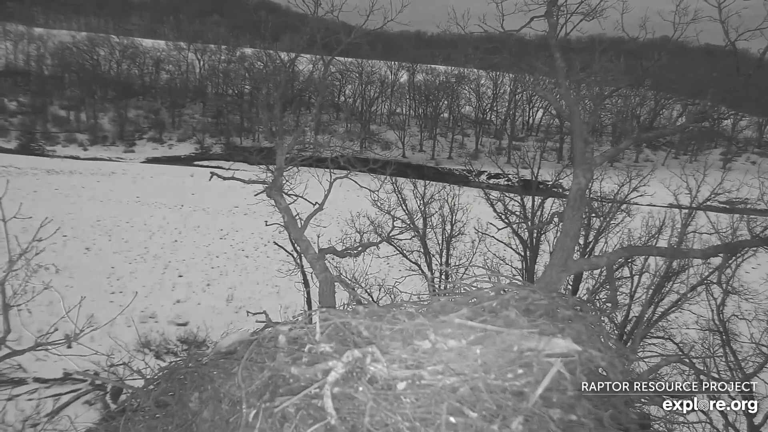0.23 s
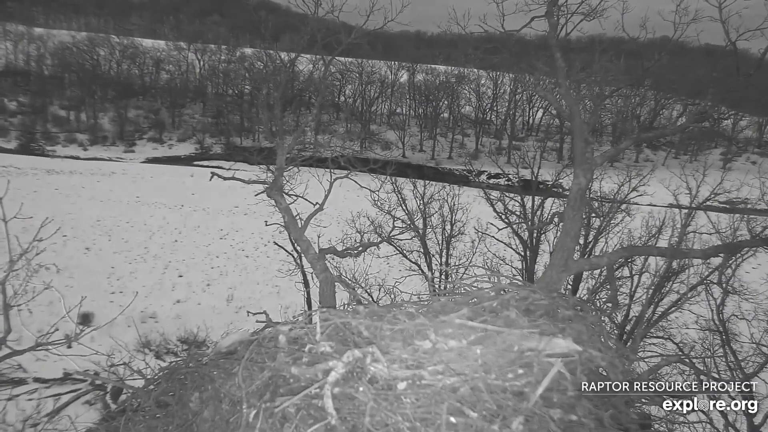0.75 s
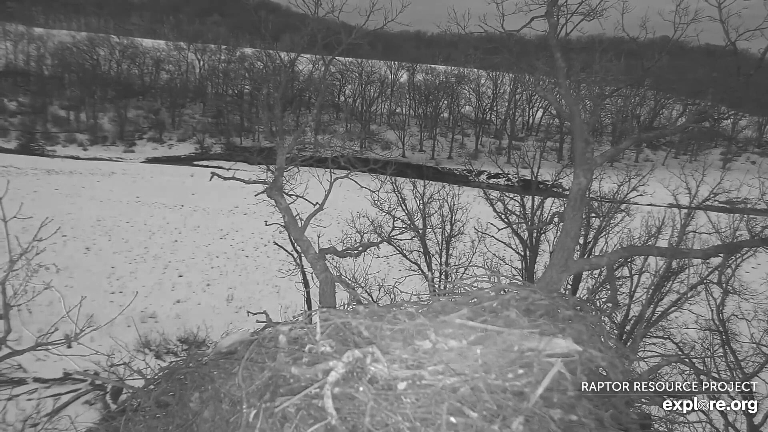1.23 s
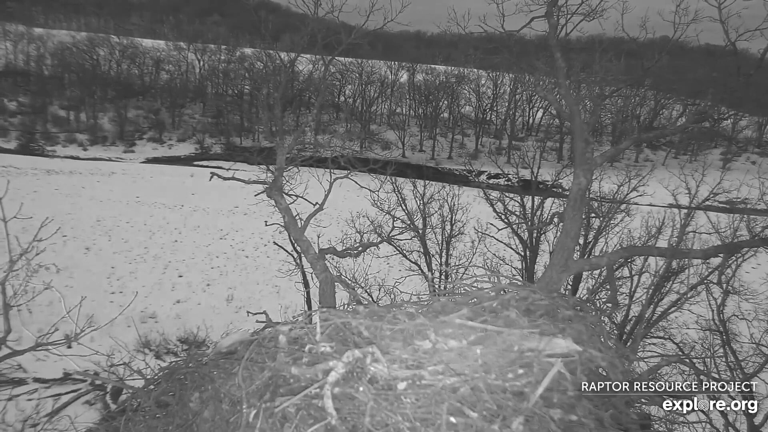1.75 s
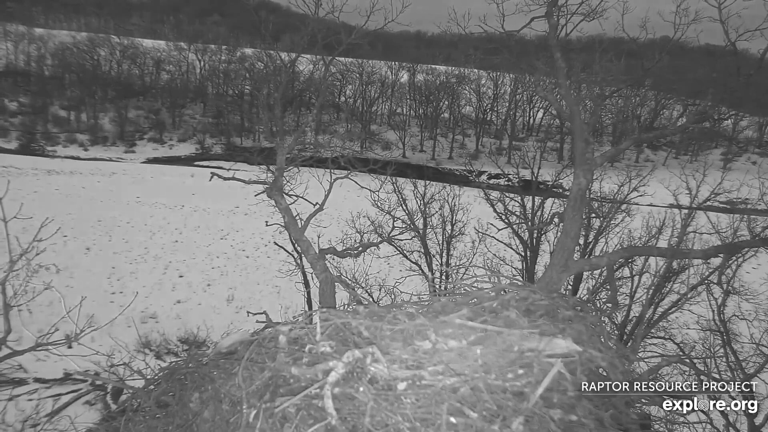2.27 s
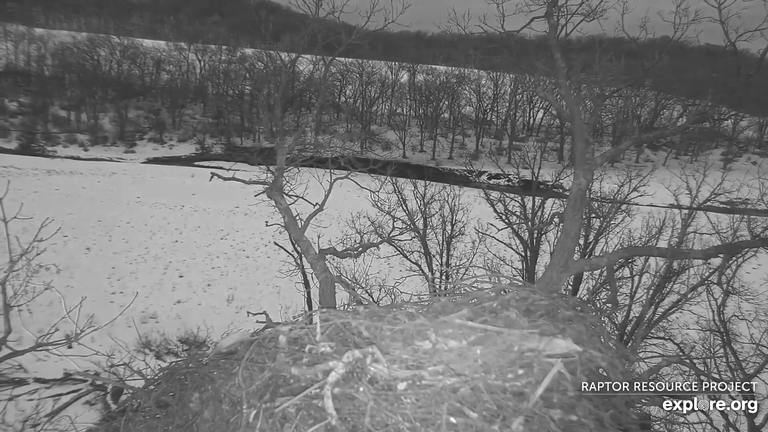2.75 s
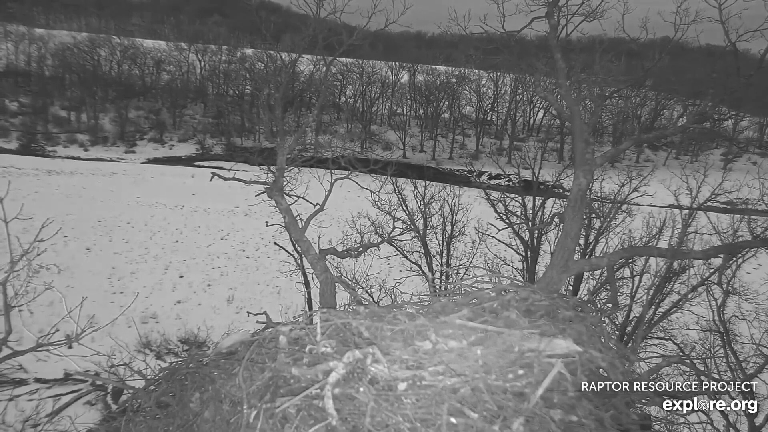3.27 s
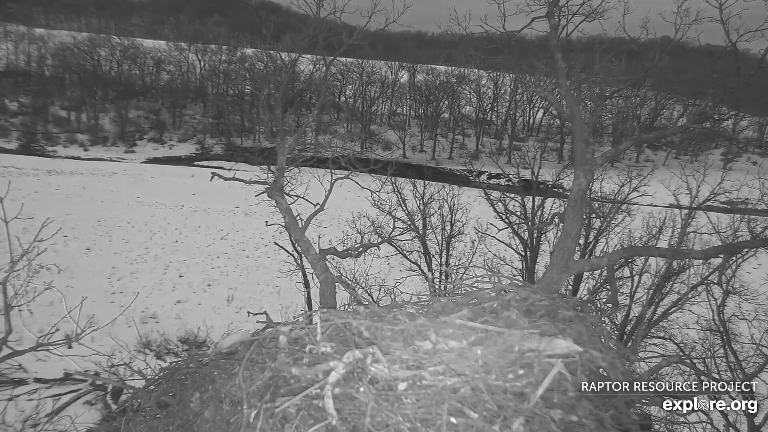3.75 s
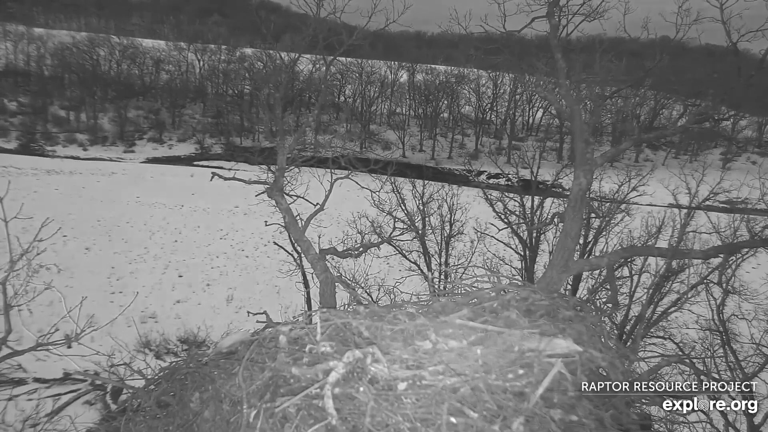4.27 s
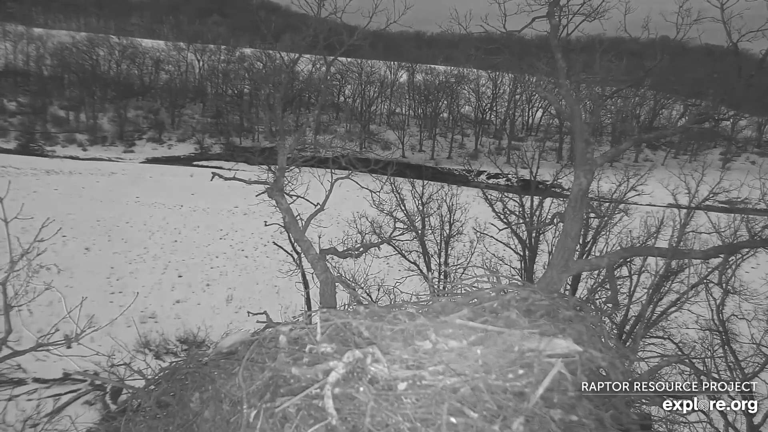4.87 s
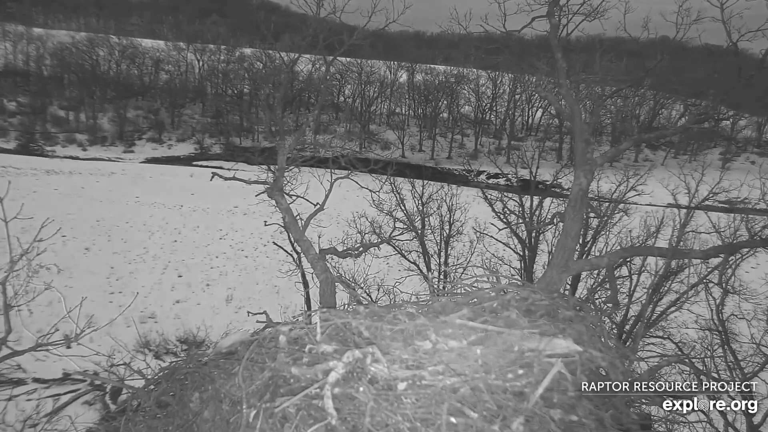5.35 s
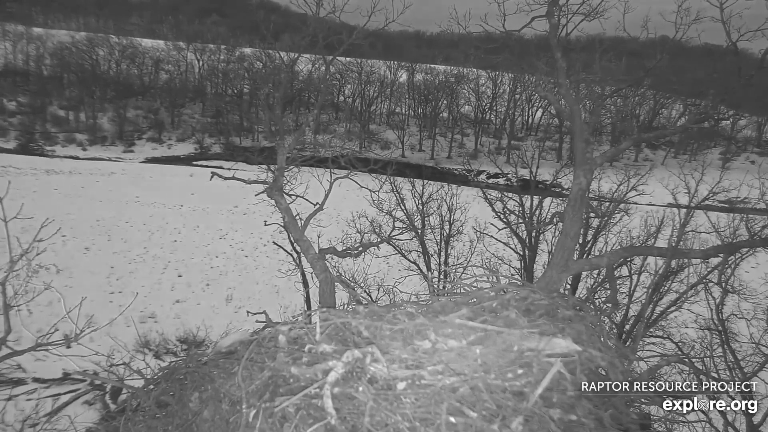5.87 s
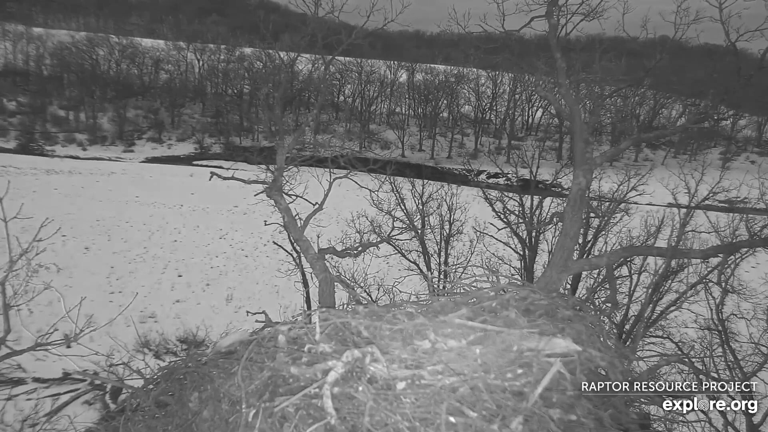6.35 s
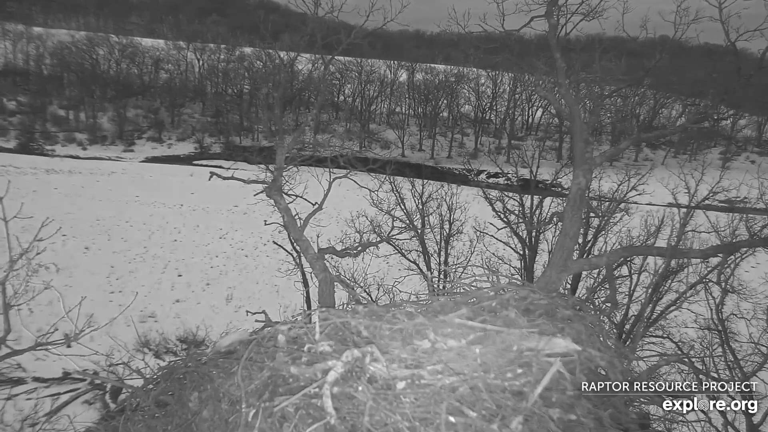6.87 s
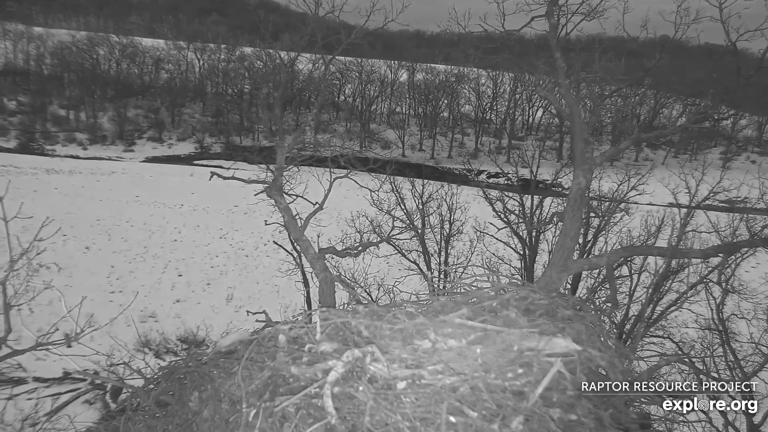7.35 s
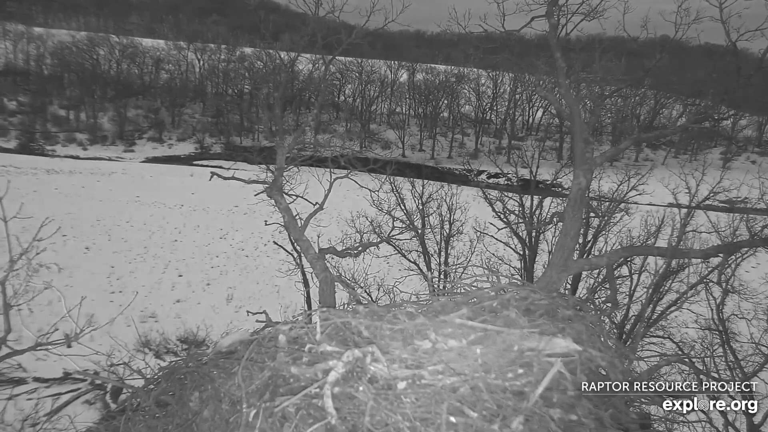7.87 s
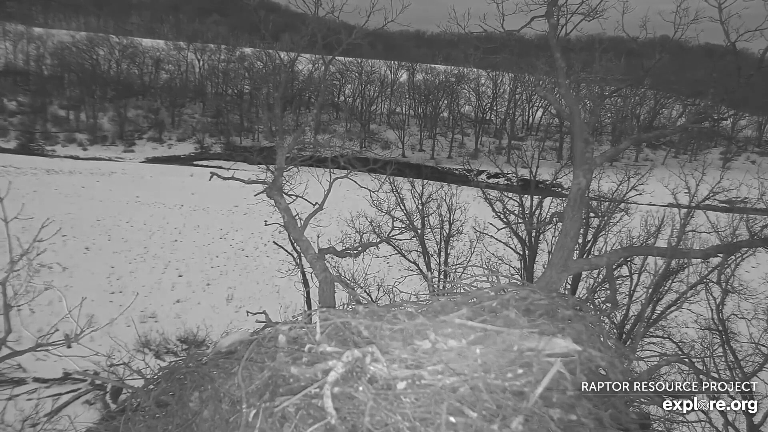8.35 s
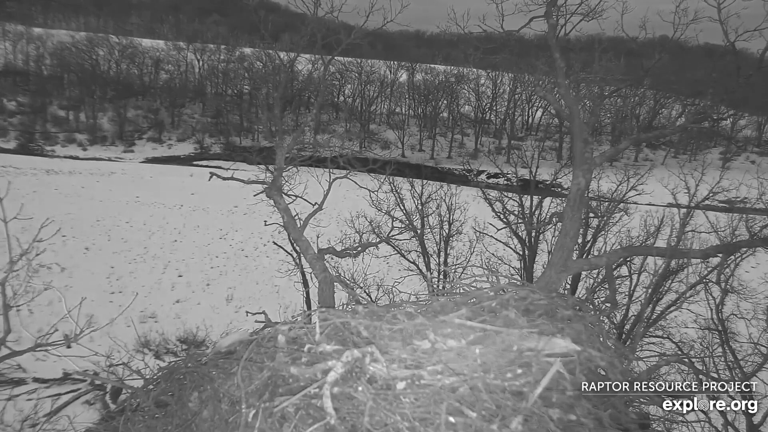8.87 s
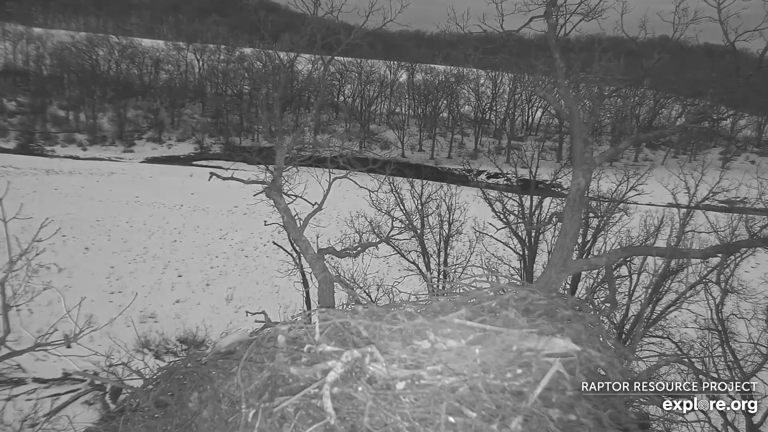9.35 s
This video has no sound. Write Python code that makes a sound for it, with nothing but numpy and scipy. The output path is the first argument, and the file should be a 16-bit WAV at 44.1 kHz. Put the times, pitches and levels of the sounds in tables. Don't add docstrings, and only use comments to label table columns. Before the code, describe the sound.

Throughout, distant traffic makes a steady, smooth low rumble, with a deep engine hum near 95 hertz, soft low wind and faint high hiss. At first there is only this bed, with two tiny ticking gasps around 1 second. From 2 to 3.7 seconds a large raptor somewhat away gives irregular, very short piercing squeals near 3.5 kilohertz, mixed with hoarse rasping breaths, thin whistles and a yelp at 3.1. After a pause, a faint, turned-away run of five piping notes steps downward at 4.5-4.9. A clearer run follows at 5.5-6.2, then a stronger one at 7.1-8.1, each rising briefly on its opener and ending on a low pip. A soft gust passes around 8.4. The last, brightest run starts at 8.8 and continues almost to the end at 9.6. Notes come about eight per second, with short woodland echoes.

```python
import sys
import numpy as np
from scipy import signal
from scipy.io import wavfile
from scipy.ndimage import uniform_filter1d

SR = 44100
rng = np.random.default_rng(int(sys.argv[2]) if len(sys.argv) > 2 else 0)


def file_out(sig):
    cols = np.atleast_2d(sig).T
    lim = np.clip(cols, -1, 1)
    pcm = np.round(lim * 32767).astype(np.int16)
    wavfile.write(sys.argv[1], SR, pcm)


def rack_gain(trim_db):
    fader = np.asarray(trim_db, float)
    return 10 ** (fader / 20)


N = 424241

# frequency in Hz, level in dB per Hz.
TRAFFIC_COLOUR = [(60, -36), (80, -11), (95, -7.5), (120, -3.5), (145, 0.5), (210, -8), (290, -12.5),
                  (420, -24), (540, -34), (700, -34.5), (1100, -45.5), (1500, -54), (2000, -61),
                  (2600, -94)]
# time in seconds, level in dB.
TRAFFIC_SWELL = [(0, -21), (1.5, -21.5), (2.5, -20), (4.3, -22.5), (5.5, -22.5), (7, -21.5), (8.3, -20.5),
                 (9.62, -21)]
# frequency in Hz, level in dB per Hz.
WIND_COLOUR = [(13, -58), (22, -38), (40, -16), (55, -1.5), (66, 13), (74, 19.5), (84, 14.5), (95, -36.5)]
# time in seconds, firing rate in Hz, level in dB.
ENGINE = [(0, 95.75, -26), (1, 95.3, -26), (2.8, 95.85, -25), (4.1, 96.56, -26), (5.5, 96.06, -24.5),
          (6.2, 96.06, -25.5), (7.5, 94.3, -26), (8.4, 97.5, -24.5), (8.7, 97.3, -23.5), (9.62, 97.6, -24)]
# frequency in Hz, level in dB per Hz.
HISS_COLOUR = [(1200, -34), (1700, -25), (2100, -45), (2500, -20), (3200, -10), (4000, -7.5), (5000, -5.5),
               (6300, -3.5), (8500, -3), (11000, 0.5), (13700, 1), (15500, -2)]
# start in seconds, level in dB, length in seconds,
# beak opening as a factor on the throat resonances.
GASPS = [
    (1.006, -47.5, .006, 1.14),
    (1.127, -51, .006, 1.2),
    (4.449, -54, .015, 1.05),
    (5.589, -48.5, 0.013, 1.08),
    (7.188, -52, .035, 0.97),
    (7.228, -44, 0.029, 1.13),
    (8.082, -62, 0.013, 0.73),
    (8.857, -41, 0.046, 1.116),
    (9.234, -45, .02, 1.13),
    (9.374, -45, 0.023, 1.06),
]
# frequency in Hz, width in Hz, level in dB.
THROAT = [(3920, 420, -2), (4720, 540, 2.5), (5430, 730, -0.5)]
# start in seconds, level in dB, pitch in Hz,
# 2nd harmonic in dB, length in seconds.
SQUEALS = [(1.957, -16, 3487, -31, 0.011), (2.3343, -9.5, 3470, -26, 0.015),
           (2.4613, -20, 3470, -17, 0.011), (2.7437, -9.5, 3460, -14, 0.016),
           (2.8614, -27, 3540, -12, 0.013), (3.5902, -15.5, 3446, -12, 0.028),
           (4.4707, -28, 3560, -27, .012), (4.5775, -26, 3580, -26, 0.014), (4.6977, -44, 3500, -20, 0.015),
           (5.6042, -21.5, 3606, -12, 0.011), (5.7154, -26, 3590, -16, 0.011),
           (7.2429, -18, 3660, -13, 0.012), (7.3721, -31.5, 3700, -15, .013),
           (8.9047, -18, 3790, -22, 0.011), (8.9994, -34, 3670, -16, 0.011)]
# start in seconds, hiss in dB, croak in dB,
# croak pitch in Hz, length in seconds.
RASPS = [(1.974, -45, -66, 1200, 0.055), (2.098, -41, -46, 1100, 0.057), (2.354, -44, -55, 1240, 0.037),
         (2.468, -39, -44.5, 930, 0.041), (2.759, -43, -60, 1250, 0.064), (2.853, -43, -48, 1080, 0.065),
         (3.177, -44, -49, 970, 0.047), (3.229, -44, -65, 990, 0.062), (3.293, -45, -38, 920, 0.0241),
         (3.603, -49, -58, 1100, 0.051), (3.654, -44, -62, 1110, 0.055), (3.705, -57, -40, 890, 0.02)]
# start in seconds, level in dB, start pitch in Hz,
# end pitch as a factor, length in seconds.
WHISTLES = [(2.028, -33.5, 5230, 1.22, 0.078), (2.089, -30, 5660, 0.86, 0.0061),
            (2.093, -29, 4300, 0.95, .013), (2.325, -39, 2840, 1.02, 0.018), (2.337, -40, 6300, 1.06, .02),
            (2.398, -34.5, 4800, 1.1, 0.014), (2.41, -31.5, 5470, 1.13, 0.06),
            (2.456, -27, 4220, 0.985, 0.0094), (2.762, -37, 3050, 0.96, 0.018),
            (2.828, -32.5, 6240, 1.025, 0.052), (2.853, -29.5, 4320, 0.93, 0.019),
            (3.181, -37, 3630, 0.94, 0.02), (3.587, -36.5, 2820, 1.03, 0.034),
            (3.59, -37, 4130, 0.98, 0.014), (3.6, -32.5, 6350, 0.96, 0.022),
            (7.484, -46, 4500, 1.001, 0.013), (8.22, -50, 3790, 0.99, 0.02), (8.851, -37, 5100, 0.97, .012),
            (8.87, -34, 5040, 1.1, 0.012), (9.51, -41, 4900, 1, .02)]
# start in seconds, level in dB, pitch in Hz,
# 2nd harmonic in dB, 3rd harmonic in dB.
YELPS = [
    (3.146, -17.5, 2827, -0.65, -16),
]
PIPED_NOTES = [(4.4753, -35, 3037, 1, -16), (4.582, -36.5, 3050, -2, -18), (4.684, -36, 2916, 4, -22),
               (4.796, -40.5, 2860, 3.5, -17), (4.91, -53, 2730, -6, -12), (5.715, -30, 2985, 4.5, -18),
               (5.8294, -29.5, 2936, 4.5, -16), (5.9506, -34, 2830, 4.5, -20),
               (6.0865, -34.5, 2874, 0.5, -23), (7.3626, -26.5, 3024, 4, -2.5), (7.493, -25, 2952, 1.5, -6),
               (7.6298, -28, 2938, 7.5, -10), (7.773, -27.5, 2871, 4, -18), (7.931, -31, 2850, 0.5, -26),
               (8.8872, -24.5, 3086, 5, -2), (9.002, -24.5, 3050, 5.5, -0.5), (9.1186, -25, 2985, 10, -7),
               (9.251, -24, 2857, 6, -25), (9.3865, -24, 2814, 5, -26), (9.5198, -29, 2820, 0.5, -25)]
RUN_OPENERS = [
    (5.4869, -29.5, 2930, 3.5, -19),
    (7.1192, -24.5, 2983, 5, -4.5),
    (8.775, -25.5, 2910, 9, 1),
]
RUN_CLOSERS = [
    (6.2213, -32, 2095, -1, -15),
    (8.093, -37, 2140, 7, -5),
    (9.5158, -45, 2150, -1, -26),
]
# start in seconds, main echo delay in seconds, echo in dB,
# scattered tail in dB, head shadow from 0 to 1.
FACING = [
    (0, .021, -13, -12, .05),
    (2.9, 0.017, -6, -12.5, 0.28),
    (3.5, 0.021, -8.5, -9.5, 0),
    (4.2, 0.016, 6.5, 0.5, 0.97),
    (5.3, .023, 3.5, -3, 0.44),
    (6.19, .023, -8, -5.5, .3),
    (6.8, 0.025, 1.5, -1.5, 0.03),
    (8.06, .023, -1, -3.5, 0.1),
    (8.6, 0.019, -1.5, -6.5, 0.19),
]
# factor on the main echo delay, level in dB.
TRUNKS = [(.45, -5), (1.001, -1.2), (1.298, -5), (1.749, -9), (2.2, -15), (2.899, -17)]
# frequency in Hz, time to fall 60 dB in seconds.
WOODS_DECAY = [(800, 0.34), (2000, 0.62), (2800, 0.67), (3500, 0.52), (6000, 0.48), (9000, 0.26)]


def evened(x):
    return x / np.sqrt(np.mean(x ** 2) + 1e-20)


def read(points, hz):
    f, value = np.transpose(points)
    return np.interp(np.log(hz + 1), np.log(f + 1), value)


def add(mix, s, sound):
    part = mix[round(s * SR):][:len(sound)]
    part += sound[:len(part)]


def resonate(x, hz, width):
    turn = np.exp(2j * np.pi * np.cumsum(hz * np.ones(len(x))) / SR)
    r = np.exp(-np.pi * width / SR)
    smooth = signal.lfilter([1 - r], [1, -r], x / turn + 1e-18)
    return 2 * (turn * smooth).real


def resonate_twice(x, hz, width):
    return resonate(resonate(x, hz, width), hz, width)


def noise(colour, patchy_db, size):
    hz = np.fft.rfftfreq(size, 1 / SR)
    real, imag, patches = rng.standard_normal((3, len(hz), 4 * N // size + 5))
    patches = uniform_filter1d(patches, size=9, axis=0)
    patches = evened(uniform_filter1d(patches, size=7, axis=1))
    spectra = (real + 1j * imag) * rack_gain(read(colour, hz)[:, None] + patchy_db * patches)
    return evened(signal.istft(spectra, nperseg=size, noverlap=3 * size // 4)[1][:N])


def rumble():
    t = np.arange(N) / SR
    traffic = rack_gain(np.interp(t, *np.transpose(TRAFFIC_SWELL))) * noise(TRAFFIC_COLOUR, patchy_db=1.0, size=4096)
    wind = rack_gain(-35) * noise(WIND_COLOUR, patchy_db=2.5, size=8192)
    gust_s, gust_width_s = 8.37, 0.35
    buffet = evened(resonate_twice(rng.standard_normal(N), 48.3, 30))
    gust = rack_gain(-40) * np.exp(-((t - gust_s) / gust_width_s) ** 2) * buffet
    return traffic + wind + gust


def drone():
    s, *columns = np.transpose(ENGINE)
    hz, db = (np.interp(np.arange(N) / SR, s, column) for column in columns)
    firing = np.sqrt(2) * np.sin(2 * np.pi * np.cumsum(hz) / SR)
    air = rng.standard_normal((2, N))
    upper = evened(resonate(resonate(air[0], 1.492 * hz, 9.6), 1.492 * hz, 9.8))
    other = evened(resonate_twice(air[1], 104.67, 5.7))
    return rack_gain(db) * (firing + rack_gain(-8) * upper) + rack_gain(-27.5) * other


def preamp_hiss():
    return rack_gain(-44) * noise(HISS_COLOUR, patchy_db=2.0, size=512)


def breath(length, per_s, flutter):
    n = max(round(length * SR), 40)
    speed, strength = np.repeat(rng.standard_normal((2, 20)), n // 20 + 1, axis=1)[:, :n]
    turns = np.cumsum(per_s * (1 + 0.24 * speed)) / SR
    opening = 0.33 + np.exp(-(turns % 1) / flutter)
    puffs = opening * rng.standard_normal(n) * rack_gain(2.7 * strength)
    return np.pad(puffs * np.hanning(n), (0, 300))


def throat(air, opening):
    wander = np.interp(np.linspace(0, 5, len(air)), np.arange(6), rng.standard_normal(6))
    bend = opening * (1 + 0.03 * wander)
    return sum(rack_gain(db) * resonate_twice(air, hz * bend, width) for hz, width, db in THROAT)


def gasps(out):
    leads = []
    for s, db, hz, *_ in PIPED_NOTES:
        above_top = hz - 3050
        leads.append((s - 0.016, db - 14.5 + 0.07 * above_top, 0.019, 1.043 + 0.00075 * above_top))
    for s, db, length, opening in GASPS + leads:
        add(out, s, rack_gain(db) * evened(throat(breath(length, 300, 0.58), opening)))


def tone(hz, glide, length, parts_db, edge=0.49, scoop=0.021, shake=0.0061, flutter_db=3.0):
    u = np.linspace(0, 1, max(round(length * SR), 40))
    steps = u * length / 0.00285
    tremble, waver = (np.interp(steps, np.arange(40), row) for row in rng.standard_normal((2, 40)))
    slide = (glide - 1) * np.sin(np.pi / 2 * u)
    bend = 1 + slide - scoop * np.exp(-u * length / 0.0033) + shake * tremble
    turns = np.cumsum(hz * bend) / SR
    wave = sum(rack_gain(db) * np.sin(2 * np.pi * (k + 1) * turns) for k, db in enumerate(parts_db))
    return wave * rack_gain(flutter_db * waver) * signal.windows.tukey(len(u), edge)


def squeals(out):
    for s, db, hz, second_db, length in SQUEALS:
        parts_db = db - 4.5 + np.array([0, second_db, -34])
        note = tone(hz, 1.005, 1.11 * length, parts_db, edge=0.67, scoop=0.011, shake=0.0044, flutter_db=2.0)
        add(out, s - 0.004, note)


def rasps(out):
    for s, hiss_db, croak_db, hz, length in RASPS:
        air = breath(1.3 * length, 170, 0.24)
        hiss = throat(air, rng.uniform(0.855, 1.14)) + 0.32 * resonate(air, 1100, 2800)
        croak = resonate(resonate(air, hz, 240), hz, 340)
        thump = resonate_twice(air, 306, 240)
        rasp = rack_gain(hiss_db) * evened(hiss) + rack_gain(croak_db) * evened(croak) + rack_gain(-35.5) * evened(thump)
        add(out, s - 0.008, rasp)


def sum_whistles():
    sums = []
    for s, db, hz, *_ in PIPED_NOTES:
        for up_s, up_db, up_hz, *_ in SQUEALS:
            if abs(up_s - s) < 0.025:
                sums.append((s, min(db - 4.5, up_db + 6), 1.035 * (hz + up_hz), 0.96, 0.0061))
    return sums


def whistles(out):
    full_strain, calm = 0.14, 0.22
    halo_filter = signal.butter(N=3, Wn=940 / SR)
    for s, db, hz, glide, length in WHISTLES + sum_whistles():
        strain = np.clip(abs(glide - 1) / full_strain, calm, 1)
        clear = tone(hz, glide, length, [db], shake=0.022 * strain, flutter_db=4.0)
        air = evened(signal.lfilter(*halo_filter, rng.standard_normal(5200))[200:])
        add(out, s, clear * (0.86 + strain * rack_gain(-2.5) * air[:len(clear)]))


def lower_voice(out):
    # rows, start pitch factor, glide factor, length in seconds
    kinds = [(YELPS, 0.94, 1.1, 0.0357), (PIPED_NOTES, 1.01, 0.98, 0.023),
             (RUN_OPENERS, 0.97, 1.055, 0.0383), (RUN_CLOSERS, 1.01, 0.99, 0.016)]
    for rows, start, glide, length in kinds:
        for s, db, hz, second_db, third_db in rows:
            parts_db = db - 4.0 + np.array([0, second_db, third_db, third_db - 16])
            add(out, s - 0.003, tone(hz * start, glide, length, parts_db))


def raptor():
    out = np.zeros(N)
    for sing in (gasps, squeals, rasps, whistles, lower_voice):
        sing(out)
    return out


def scatter():
    taps = np.zeros(SR)
    at = np.arange(400, SR - 20, 20)
    taps[at + rng.integers(0, 20, len(at))] = rng.choice([-1., 1.], len(at))
    hz, s, z = signal.stft(taps, SR, nperseg=256)
    decay = rack_gain(-60 * s / read(WOODS_DECAY, hz)[:, None])
    tail = signal.istft(z * decay, SR, nperseg=256)[1]
    return tail / np.linalg.norm(tail)


def woods(x):
    out = np.zeros(N)
    ends = [row[0] for row in FACING[1:]] + [N / SR]
    for (s, delay, echo_db, tail_db, shadow), end in zip(FACING, ends):
        path = rack_gain(tail_db) * scatter()
        path[:6] += shadow / 6 + (1 - shadow) * signal.unit_impulse(6)
        for factor, db in TRUNKS:
            bark = 0.11 * rng.standard_normal(200) * np.exp(-np.arange(200) / 70)
            bark[:3] += [0.25, 0.5, 0.25]
            add(path, factor * delay, rack_gain(echo_db + db) * bark)
        phrase = x[round(s * SR):round(end * SR)]
        add(out, s, signal.oaconvolve(phrase, path))
    return out


def scene():
    return (rumble() + drone() + woods(raptor()))[None]


def low_pass(x):
    return signal.sosfilt(signal.butter(12, 15690, fs=SR, output="sos"), x)


def record(dry):
    return low_pass(dry + preamp_hiss())


dry = scene()
out = record(dry)
file_out(out)
```